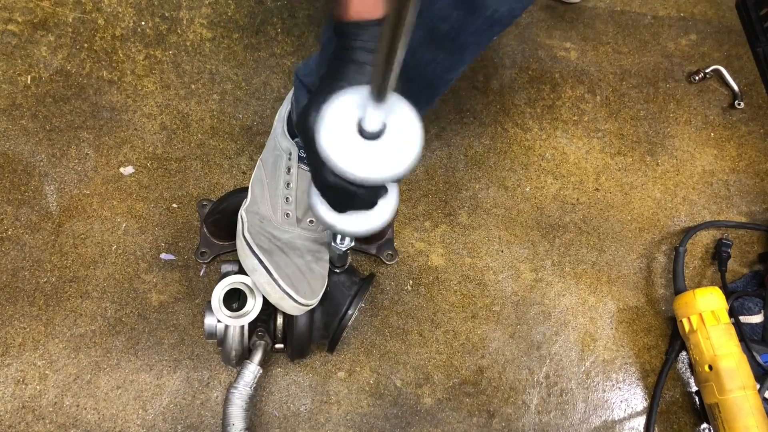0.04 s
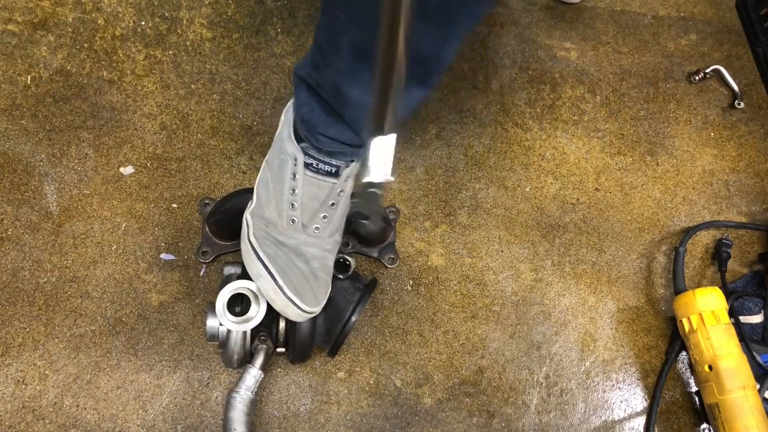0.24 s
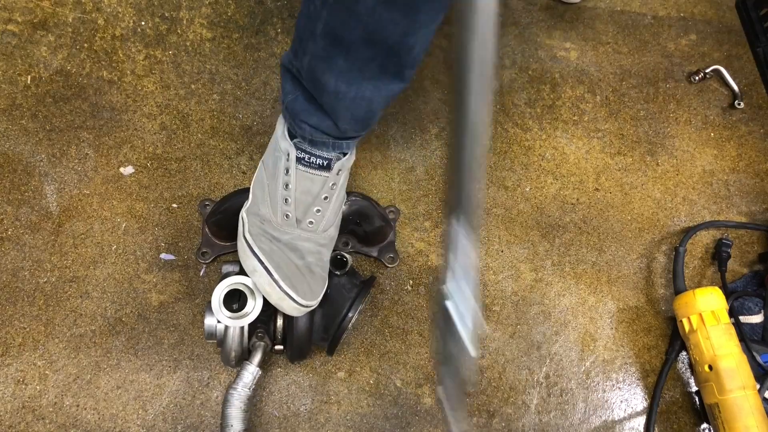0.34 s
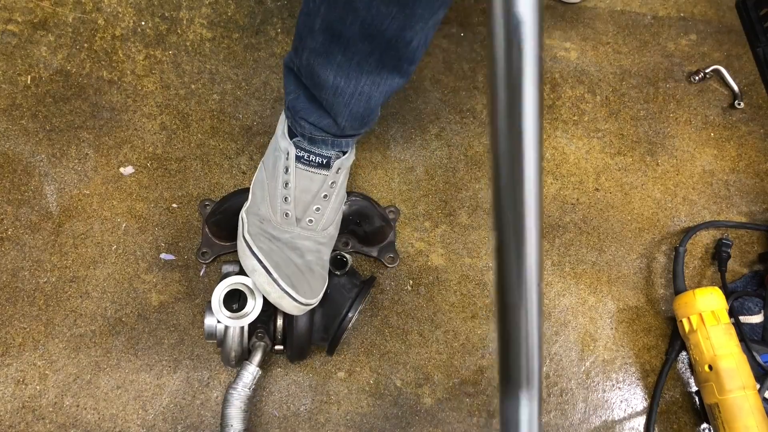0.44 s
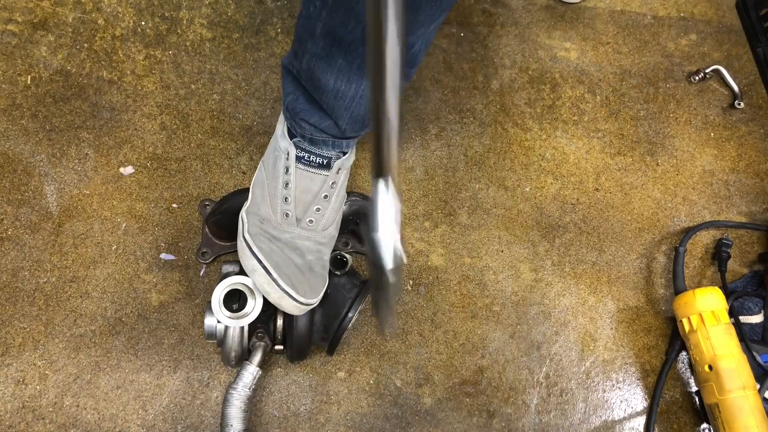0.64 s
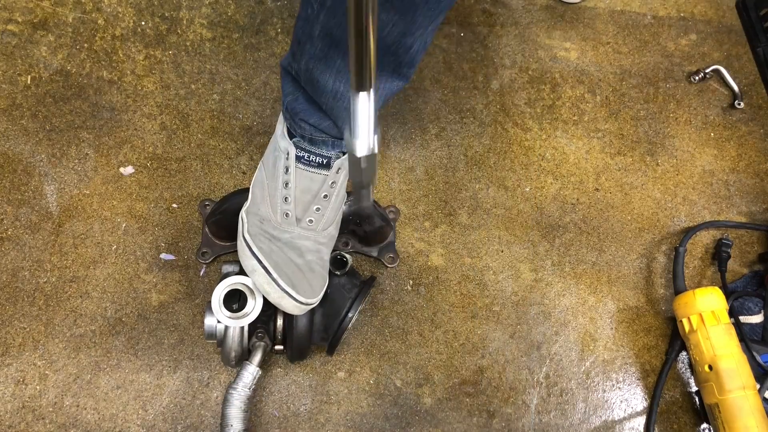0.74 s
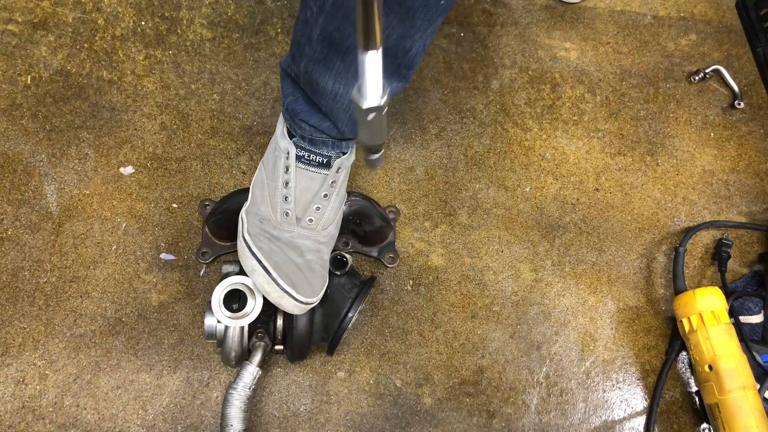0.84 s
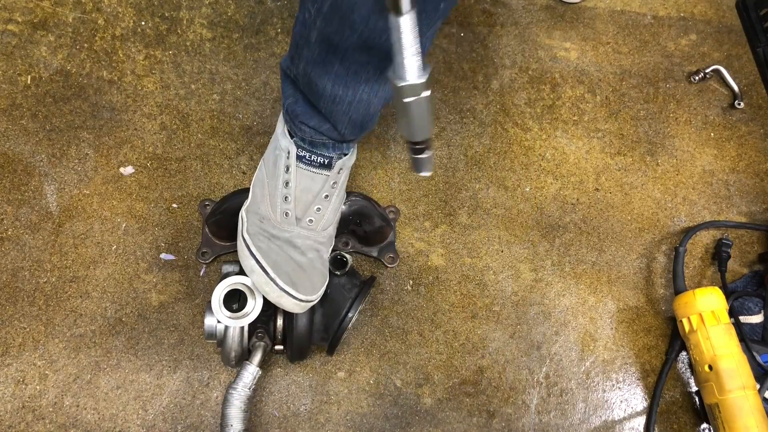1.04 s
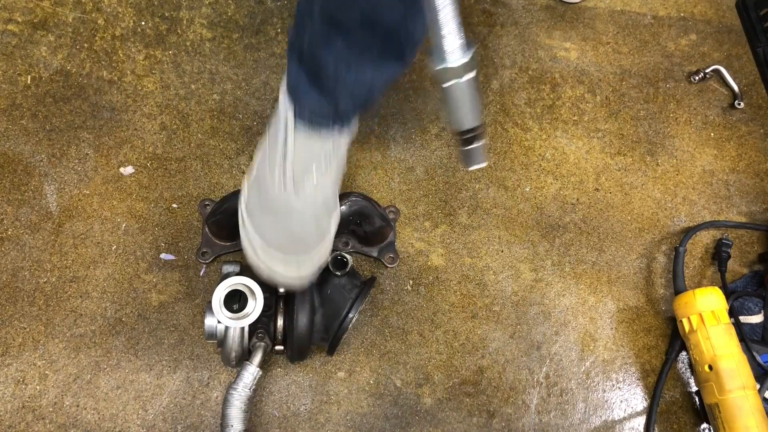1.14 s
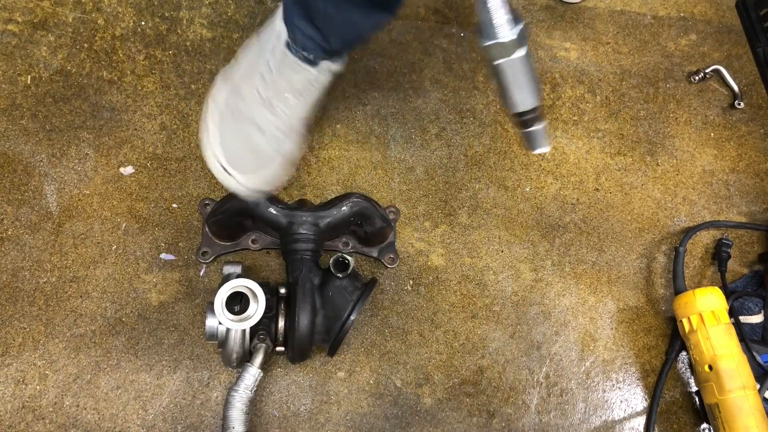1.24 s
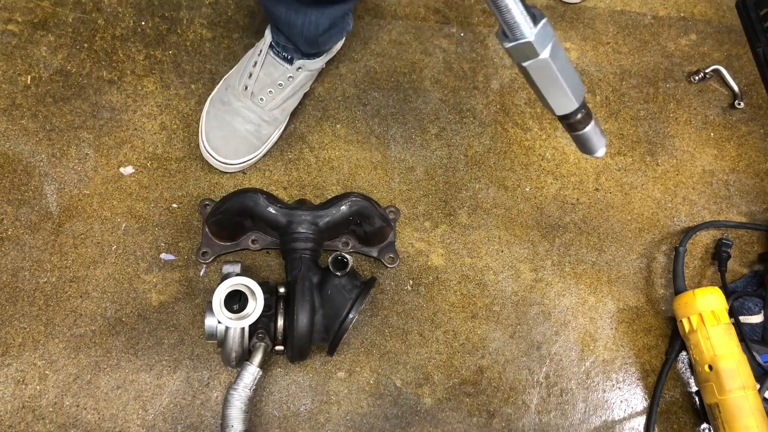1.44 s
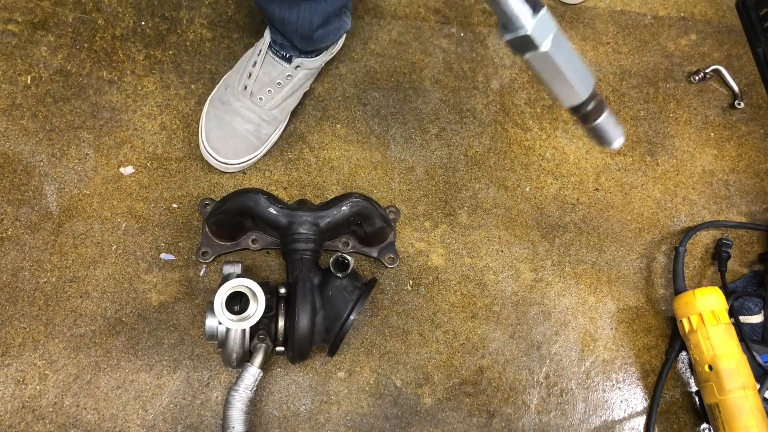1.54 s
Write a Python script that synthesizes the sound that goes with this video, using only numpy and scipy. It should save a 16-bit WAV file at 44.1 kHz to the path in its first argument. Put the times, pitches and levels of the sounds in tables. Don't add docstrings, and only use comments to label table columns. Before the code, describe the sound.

A slide hammer rasps along its steel rod and bangs sharply, a part rattles loose, the weight clinks back with a bright ring, then a shoe scuffs and iron knocks dully on workshop concrete, heard close.

```python
import sys
import numpy as np
from scipy import signal
from scipy.io import wavfile

SR = 44100
rng = np.random.default_rng(int(sys.argv[2]) if len(sys.argv) > 2 else 0)


def gain_from_db(level_db):
    decades = np.asarray(level_db, float) / 20
    return 10 ** decades


def int16_out(signal):
    q = np.round(np.clip(np.atleast_2d(signal).T, -1, 1) * 32767)
    wavfile.write(sys.argv[1], SR, q.astype(np.int16))


N = 70560
T = np.arange(N) / SR

# [f/Hz, level/dB]
HUM_COLOUR = [(18, -56), (30, -30.5), (54, -7), (539, -11), (714, -4), (854, -20), (970, -4.5),
              (13500, -31.5)]

# [f/Hz, level/dB]
RASP = [(0, -60), (.03, -59), (.066, -54), (.085, -59), (.11, -69.5)]
RASP_COLOUR = [(88, -48.5), (150, -13), (244, -1), (662, -10.5), (1020, -3), (3620, -4.5), (4160, -10.5),
               (16000, -35)]
# [f/Hz, level/dB, decay by 60 dB/s]
SINGING = [(972, -9, 0.038), (2130, -9.5, 0.039), (2350, -8, 0.027), (3130, -7.5, .04), (3440, -11.5, 0.12),
           (4190, -1, .08), (4380, -3.5, 0.02), (5330, -8, .06), (6390, -11, .05), (6750, -9, 0.063),
           (8450, -12.5, .04), (9720, -18.5, 0.063), (11500, -17, .05), (12100, -21, .04)]
# [f/Hz, level/dB, decay by 60 dB/s]
CASTING = [(149.5, -15.5, 0.096), (205, -11, 0.062), (264, -8.5, 0.042), (371, -18.5, .1),
           (500, -15.5, 0.049), (773, -2, 0.04), (939, -4, 0.0495), (1054, -7.5, 0.064),
           (1581.4, -6.5, 0.035), (1910, -7, 0.017), (2370, -17.5, 0.077), (2709, -5, .1)]

# [t/s, f/Hz, level/dB, rise/s,
# decay by 60 dB/s]
GLANCES = [(0.014, 2250, -61, 0.0091, 0.13), (.02, 2950, -59.5, 0.012, 0.13),
           (.04, 2600, -58.5, 0.0073, 0.068), (0.129, 7050, -52.5, 0.0058, 0.073),
           (0.158, 3050, -53.5, .008, .07), (.16, 6800, -58, .008, .05), (.165, 5200, -53, 0.008, 0.049),
           (0.212, 10400, -30.5, 0.007, .1), (0.22, 1910, -34, .018, 0.14), (.228, 9930, -32.5, .006, .08),
           (.238, 5150, -31.5, .006, .08), (.239, 9350, -34.5, .004, .1), (.24, 13550, -43, .008, .08),
           (.245, 8010, -31.5, .006, .08), (.25, 7030, -33.5, 0.005, 0.15), (0.263, 5200, -36, 0.0046, .08),
           (0.262, 3990, -28.5, 0.0031, 0.069), (.27, 8450, -37, 0.0054, 0.067),
           (0.277, 6590, -35, 0.0057, 0.096), (.285, 7560, -38, .006, .08),
           (0.291, 3990, -34, 0.0042, 0.031), (0.313, 4000, -34.5, .014, 0.058),
           (0.34, 6620, -45, .008, 0.083), (0.373, 4037, -47, 0.018, 0.24),
           (.566, 5265, -47, 0.0073, 0.087), (0.568, 2900, -46, 0.0021, 0.046),
           (0.572, 1800, -47, 0.0018, 0.029), (.608, 3965, -42.5, .008, 0.052),
           (.62, 4400, -75, 0.0091, 0.063), (1.24, 860, -67.5, .02, 0.24)]

# [f/Hz, level/dB]
PULL = [(.09, -75.5), (.115, -58), (.14, -50.5), (.166, -52.5), (.195, -45.5), (.2, -61)]
PULL_COLOUR = [(88, -48.5), (150, -12), (905, -14), (3350, -8.5), (4080, -8.5), (4670, -18), (7180, -9),
               (16000, -32.5)]
# [t/s, f/Hz, level/dB]
WHINE = [(.105, 4080, -75.5), (.12, 4130, -60.5), (.135, 4230, -55), (.155, 4120, -55.5),
         (.175, 4150, -55.5), (.197, 3900, -60.5)]

# [t/s, ring level/dB, crack level/dB, rise/s, fall/s]
BANGS = [
    (.176, -59, -48.5, 0.0007, .004),
    (0.1989, -19.5, -14.5, .0007, 0.0042),
]
# [f/Hz, level/dB, decay by 60 dB/s]
TAUT = [(1954, -14.5, 0.069), (3300, -5.5, .012), (4524, -10.5, .012), (6785, 0, 0.04), (9200, 2, 0.028),
        (10380, -8, 0.02), (11360, -4, 0.018), (14000, -18.5, .02)]
# [f/Hz, level/dB per Hz]
CRACK_COLOUR = [(180, -54), (300, -26.5), (3240, -9), (3760, -3.5), (5900, -17.5), (6740, -2.5), (7440, -1),
                (9240, -17.5), (16000, -20)]

# [t/s, level/dB, softness f/Hz]
KNOCKS = [
    (0.186, -38.5, 1500),
    (.219, -31.5, 1500),
    (0.242, -35, 600),
    (0.505, -42.5, 500),
    (0.57, -44, 830),
]
# [f/Hz, level/dB, decay by 60 dB/s]
SLAB = [(60, -25.5, 0.2)]

# [f/Hz, level/dB]
RATTLE = [(.2, -47.5), (.214, -43.5), (.221, -33.5), (.248, -28), (.28, -35.5), (.32, -39), (.37, -49.5),
          (.42, -51), (.5, -75)]
RATTLE_COLOUR = [(59, -42.5), (100, -26.5), (193, -13.5), (950, -5), (1330, -5), (1910, -11), (2170, -6.5),
                 (6840, -1), (16000, -14.5)]

# [t/s, rod level/dB, weight level/dB, crack level/dB, contact/s]
BLOWS = [
    (.376, -36, -48, -36.5, .006),
    (0.383, -42, -40, -35, 0.011),
    (0.5022, -24, -33, -24, 0.0061),
    (.506, -39, -25, -36, 0.0054),
    (0.569, -40.5, -76, -60, 0.007),
    (.613, -53, -80, -71, 0.0055),
    (1.05, -65.5, -95, -84, .01),
]
# [level/dB, decay by 60 dB/s]
ROD_HZ = [2150, 2830, 2935, 3950, 4005, 4050, 4400, 5150, 5190, 5270, 6540, 6627, 7030, 7565]
ROD = [(-22.5, 0.044), (-9.5, .04), (-18.5, .06), (-15.5, 0.062), (-24.5, 0.77), (-4, 0.07), (-36.5, .08),
       (-17.5, 0.059), (-4, 0.062), (-21, 0.21), (-13, 0.13), (-15, 0.26), (-19.5, .08), (-24, .1)]
# [level/dB, decay by 60 dB/s]
WEIGHT_HZ = [8032, 9351, 9706, 9743, 10400, 10800, 11430, 11820, 13230, 13500, 14550, 14700, 15350, 15510]
WEIGHT = [(-3, 0.13), (1.5, 0.054), (-8, 0.11), (-21, 0.35), (-11.5, 0.12), (-24, 0.28), (-13, 0.21),
          (-3, 0.11), (-21, 0.26), (-3.5, 0.087), (-17, 0.13), (-27, 0.14), (-14, .12), (-14.5, 0.14)]
# [f/Hz, level/dB per Hz]
CLINK_COLOUR = [(710, -49), (1200, -10), (3950, -8.5), (4600, -6), (5180, 2), (5710, -6.5), (11800, -15),
                (16000, -16)]

# [f/Hz, level/dB]
SHUFFLE = [(1.05, -86), (1.12, -70.5), (1.16, -64.5), (1.25, -72.5), (1.38, -70), (1.43, -58.5),
           (1.5, -66.5), (1.6, -75)]
SHUFFLE_COLOUR = [(59, -50), (100, -21), (129, -0.5), (854, -11), (950, 3), (1130, -11.5), (4020, -17.5),
                  (6290, -21.5), (16000, -33)]
# [f/Hz, level/dB, decay by 60 dB/s]
SOLE = [(234, -17, 0.047), (396, -8.5, 0.074), (1020, 8, 0.012), (1400, -5.5, 0.017), (2532, -5, 0.026)]
SQUEAK = [(862, -34, 0.067), (2210, -33, 0.043), (6170, -32, 0.016)]

# [t/s, level/dB, softness f/Hz, tick level/dB]
THUDS = [
    (1.3949, -30, 1500, -41),
    (1.424, -44, 590, -100),
    (1.443, -39.5, 699, -68),
    (1.489, -44, 599, -88),
    (1.549, -64.5, 600, -78.5),
]
# [f/Hz, level/dB, decay by 60 dB/s]
ROCK = [(179.2, -4.5, 0.037), (245.3, -7.5, 0.042), (392.5, -2, 0.067), (506, -10.5, 0.042),
        (615, -8, 0.032), (813, 1.5, 0.027), (978, -3.5, 0.02), (1256, -6, 0.02)]

# [f/Hz, decay by 60 dB/s]
SHOP_T60 = [(100, 0.46), (500, 1), (2000, 0.92), (6000, .5), (11000, 0.24), (15000, 0.13)]


def rms_one(x):
    return x / np.sqrt(np.mean(x ** 2) + 1e-30)


def high(x, hz):
    return signal.sosfilt(signal.butter(4, hz, "high", fs=SR, output="sos"), x)


def at_hz(points, hz):
    table_hz, values = np.transpose(points)
    return np.interp(np.log(hz), np.log(table_hz), values)


def gain_curve(rows):
    s, db = np.transpose(rows)
    return gain_from_db(np.interp(T, s, db, left=-150, right=-150))


def bank(x, gain):
    edges = 28 * 2 ** np.arange(0, 9.6, .5)
    out = np.zeros(N)
    for k, (low, top) in enumerate(zip(edges, edges[1:])):
        sos = signal.butter(2, [low, top], "band", fs=SR, output="sos")
        band = signal.sosfilt(sos, x + 1e-18)
        out += (-1) ** k * gain(np.sqrt(low * top)) * band
    return out


def colour(x, spectrum):
    return bank(x, lambda hz: gain_from_db(at_hz(spectrum, hz)))


def drift(rate_hz):
    knots = int(N / SR * rate_hz * 2) + 2
    return np.interp(T * rate_hz * 2, np.arange(knots), rng.standard_normal(knots))


def swell(s, rise, fall):
    return np.clip((T - s) / rise, 0, 1) * np.exp(-np.maximum(T - s - rise, 0) / fall)


def grains(per_s, uneven_db):
    sizes = gain_from_db(uneven_db * np.minimum(rng.exponential(1, N), 4)) * rng.standard_normal(N)
    return rms_one(sizes * (rng.random(N) < per_s / SR))


def strikes(s, db, spread):
    out = np.zeros(N)
    moments = s + spread * rng.random(len(s))
    out[(moments * SR).astype(int)] = gain_from_db(db)
    return out


def soft(rows):
    out = np.zeros(N)
    for s, db, hz in rows:
        u = np.maximum(T - s, 0) * 2 * np.pi * hz
        out += gain_from_db(db) * u * np.exp(-u) * 2 * np.pi * hz / SR
    return out


def ring(force, modes):
    out = np.zeros(N)
    for k, (hz, db, t60) in enumerate(modes):
        r = gain_from_db(-60 / (max(t60, .005) * SR))
        w = 2 * np.pi * hz / SR
        mode = signal.lfilter([0, np.sin(w)], [1, -2 * r * np.cos(w), r * r], force(hz) + 1e-18)
        out += (-1) ** k * gain_from_db(db) * mode
    return out


def waver(force, modes, wobble_db, wobble_hz):
    out = np.zeros(N)
    for k, mode in enumerate(modes):
        out += (-1) ** k * gain_from_db(wobble_db * drift(wobble_hz)) * ring(force, [mode])
    return out


def steel_modes(pitches, table, db_share=1, longest=9):
    return [(hz, db_share * db, min(longest, t60)) for hz, (db, t60) in zip(pitches, table)]


def friction(curve, spectrum, per_s, modes, ring_db, cast_db, glide=0):
    gain = gain_curve(curve)
    catches = grains(per_s / 8, 2.0)

    def force(hz):
        return gain * np.roll(catches, rng.integers(N))

    hiss = gain * rms_one(colour(grains(per_s, .8), spectrum))
    glided = T + .5 * glide * np.minimum(T - curve[3][0], .1) ** 2
    steel = rms_one(np.interp(glided, T, ring(force, modes)))
    iron = rms_one(ring(force, CASTING))
    return hiss + np.sqrt(np.mean(gain ** 2)) * (gain_from_db(ring_db) * steel + gain_from_db(cast_db) * iron)


def hum():
    x = gain_from_db(-70) * rms_one(colour(rng.standard_normal(N), HUM_COLOUR))
    return signal.sosfilt(signal.butter(4, 12000, fs=SR, output="sos"), x)


def first_pull():
    return friction(RASP, RASP_COLOUR, 9000, SINGING, ring_db=-1.5, cast_db=-9, glide=0.4)


def glances():
    out = np.zeros(N)
    for s, hz, db, rise, t60 in GLANCES:
        rough = gain_from_db(db + 4.5 * drift(119.6))
        out += rough * swell(s, rise, t60 / np.log(1000)) * np.sin(2 * np.pi * hz * T)
    return out


def second_pull():
    return friction(PULL, PULL_COLOUR, 9000, SINGING, ring_db=0, cast_db=-20, glide=-0.24)


def whine():
    s, hz, db = np.transpose(WHINE)
    phase = 2 * np.pi * np.cumsum(np.interp(T, s, hz)) / SR
    return gain_curve(list(zip(s, db))) * gain_from_db(2.2 * drift(98)) * np.sin(phase)


def bang():
    s, ring_db, crack_db, rise, fall = np.transpose(BANGS)
    crack = sum(gain_from_db(db) * swell(t, a, b) for t, db, a, b in zip(s, crack_db, rise, fall))
    crack = crack * rms_one(colour(grains(18000, 1.5), CRACK_COLOUR))
    snap = high(strikes(np.array([0.22]), -6.5, 0), 500)
    return snap + ring(lambda hz: strikes(s, ring_db, 2 * rise), TAUT) + crack


def casting_knocks():
    return ring(lambda hz: soft(KNOCKS), CASTING)


def floor_boom():
    return ring(lambda hz: soft([(row[0], row[1], hz) for row in KNOCKS + THUDS]), SLAB)


def rattle():
    shaken = steel_modes(ROD_HZ + WEIGHT_HZ[:8], ROD + WEIGHT[:8], db_share=.25, longest=.06)
    return friction(RATTLE, RATTLE_COLOUR, 12000, shaken, ring_db=-5, cast_db=-8)


def minor_modes(count):
    pitches = np.linspace(5630, 13820, count) * rng.uniform(.98, 1.02, count)
    uneven = rng.standard_normal(count)
    return [(hz, -21 + 2 * z, .08 * (5000 / hz) ** .3) for hz, z in zip(pitches, uneven)]


def blows():
    s, rod_db, weight_db, crack_db, contact = np.transpose(BLOWS)

    def on_weight(hz):
        return strikes(s, weight_db, contact)

    rod = waver(lambda hz: strikes(s, rod_db, contact), steel_modes(ROD_HZ, ROD), 2.5, 24.84)
    weight = waver(on_weight, steel_modes(WEIGHT_HZ, WEIGHT), 2.5, 59.3)
    weight += ring(on_weight, minor_modes(count=44))
    crack = sum(gain_from_db(db) * swell(t, .5 * c, 0.48 * c) for t, db, c in zip(s, crack_db, contact))
    crack = crack * rms_one(colour(grains(18000, 1.5), CLINK_COLOUR))
    return high(rod + weight + crack, 1310)


def shoe():
    rub = rng.standard_normal(N)
    shape = swell(1.138, rise=0.014, fall=0.003)
    scuff = ring(lambda hz: shape * grains(9000, 1.5), SOLE)
    drag = rms_one(colour(rub, SHUFFLE_COLOUR)) + ring(lambda hz: rub, SQUEAK)
    return gain_from_db(-48) * scuff / np.max(np.abs(scuff)) + gain_curve(SHUFFLE) * drag


def floor_knocks():
    push = soft([row[:3] for row in THUDS])
    spread_cycles = 0.78
    knock = ring(lambda hz: np.interp(T - spread_cycles / hz, T, push), ROCK)
    tick = sum(gain_from_db(db) * swell(s, 0.0007, 0.0054) for s, _, _, db in THUDS)
    tick = tick * rng.standard_normal(N)
    return knock + signal.sosfilt(signal.butter(2, 4550, fs=SR, output="sos"), tick)


def shop(x):
    first_echo_s = 0.0081
    tail = bank(rng.standard_normal(N), lambda hz: gain_from_db(-60 * T / at_hz(SHOP_T60, hz)))
    tail = tail * np.clip(T / first_echo_s - 1, 0, 1)
    return signal.fftconvolve(x, tail / np.sqrt(np.sum(tail ** 2)))[:N]


def scene():
    pulls = first_pull() + glances() + second_pull() + whine()
    hits = bang() + casting_knocks() + rattle() + blows()
    near = high(pulls + hits + shoe() + floor_knocks(), 125)
    return high(near + floor_boom() + gain_from_db(-12) * shop(near) + hum(), 34)[None]


def roll_off(x):
    return signal.sosfilt(signal.butter(12, 16640, fs=SR, output="sos"), x)


def record(dry):
    mix = signal.sosfilt(signal.cheby2(18, 60, 16000, fs=SR, output="sos"), dry)
    return roll_off(mix)


dry = scene()
out = record(dry)
int16_out(out)
```